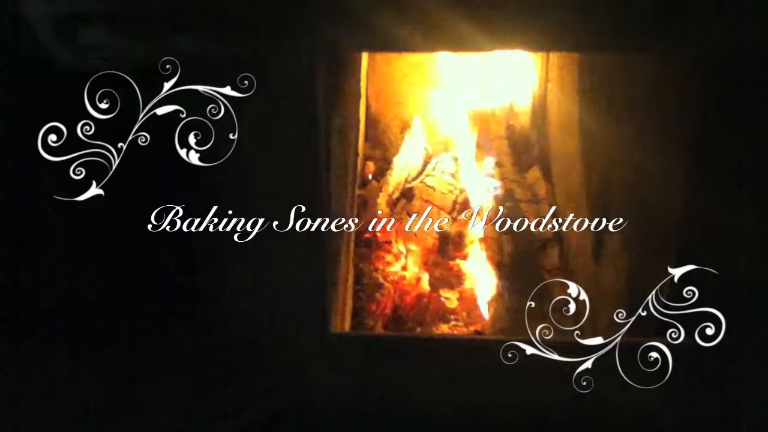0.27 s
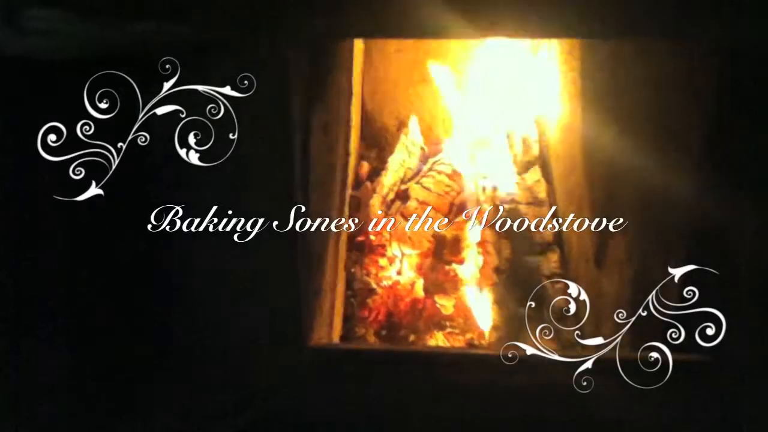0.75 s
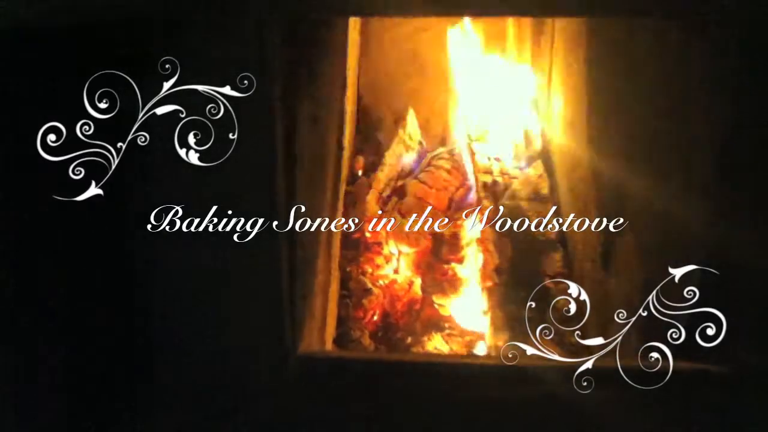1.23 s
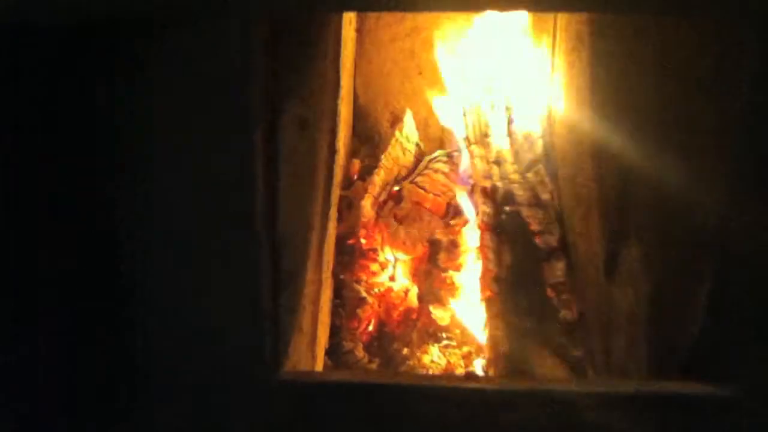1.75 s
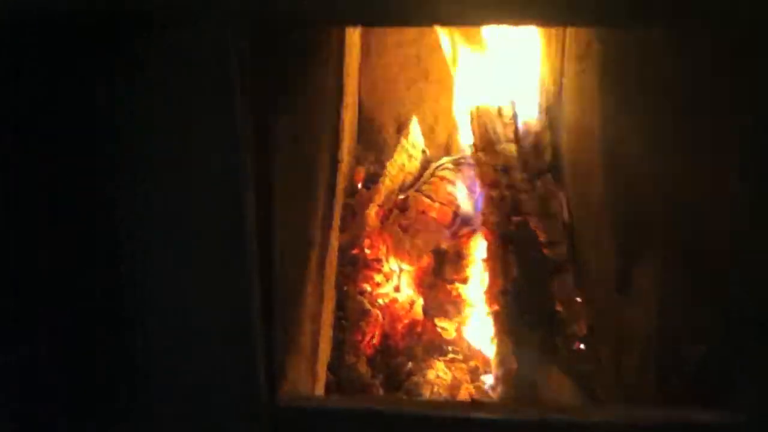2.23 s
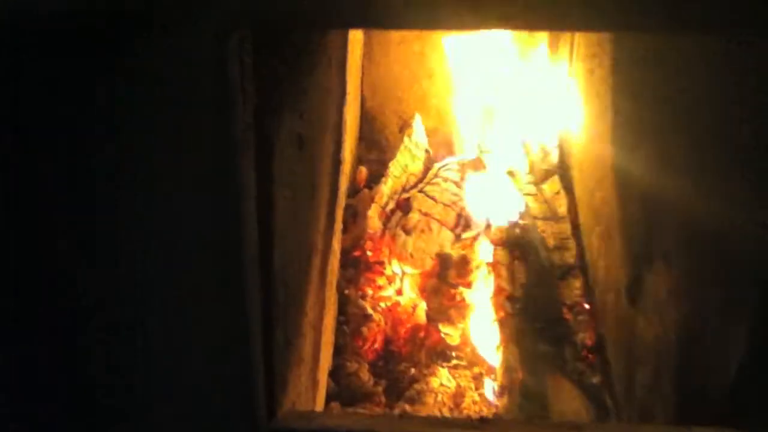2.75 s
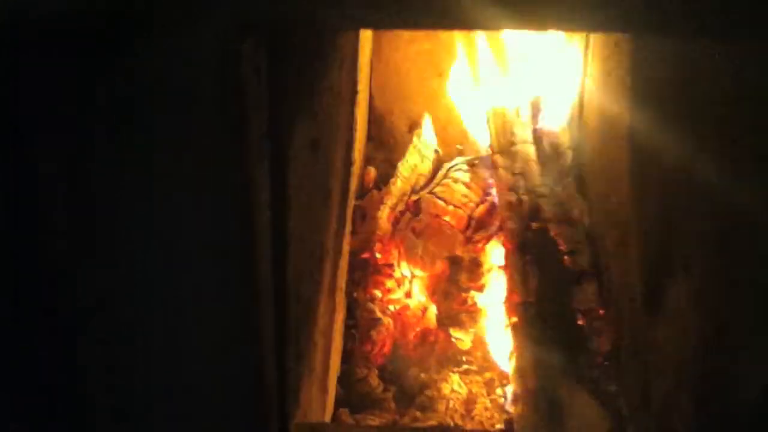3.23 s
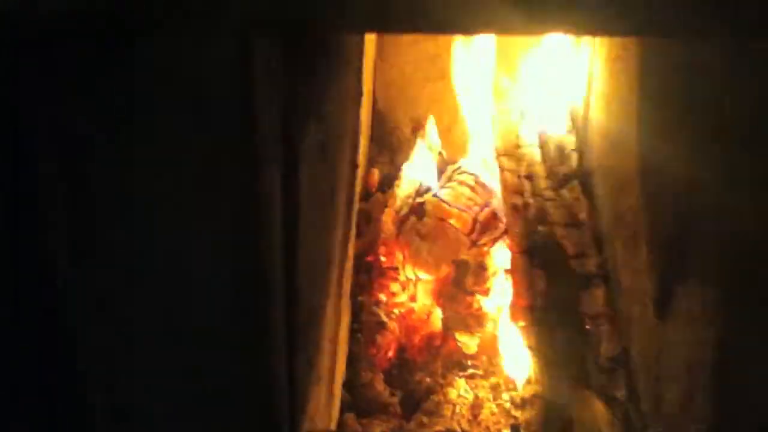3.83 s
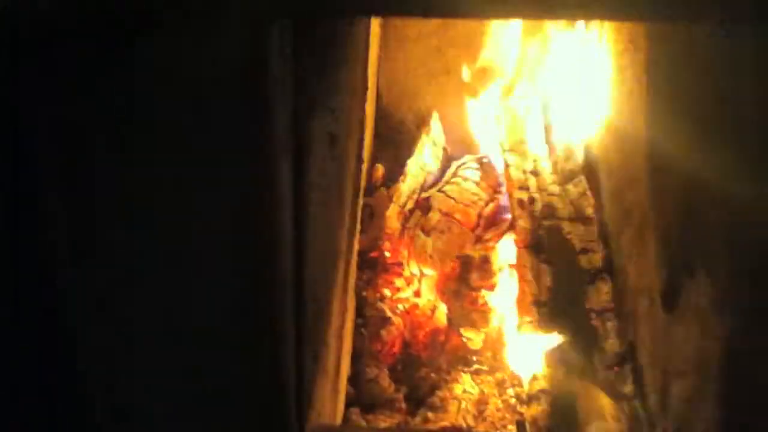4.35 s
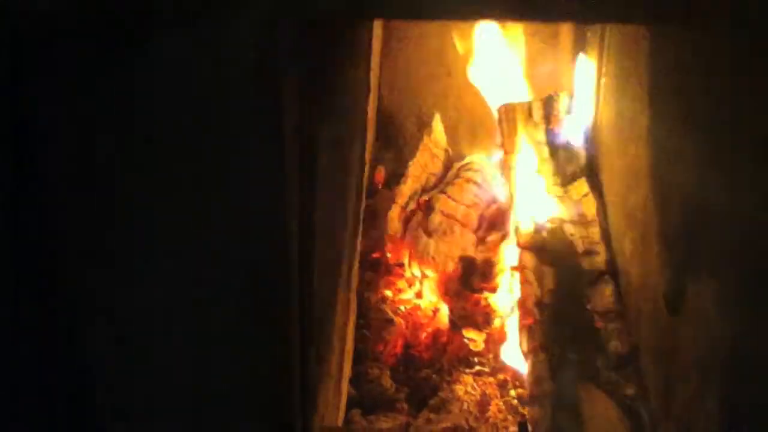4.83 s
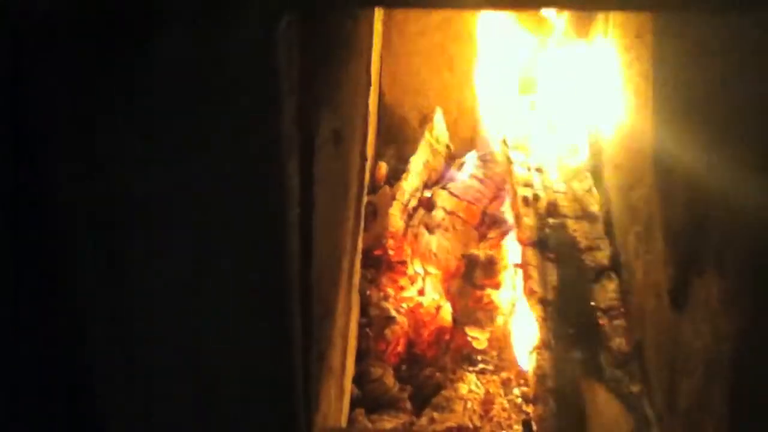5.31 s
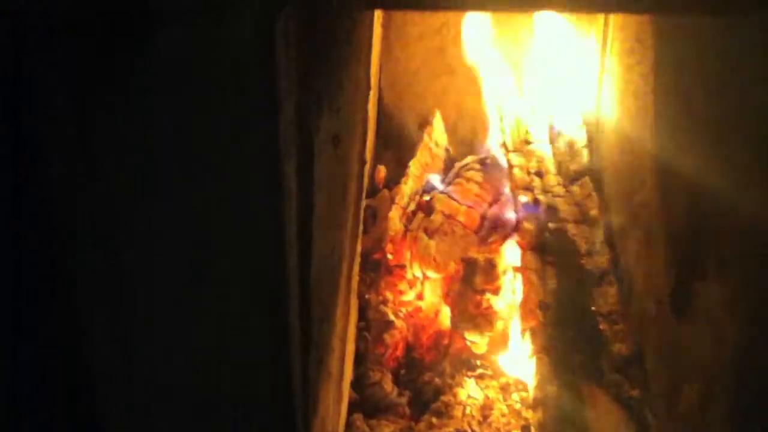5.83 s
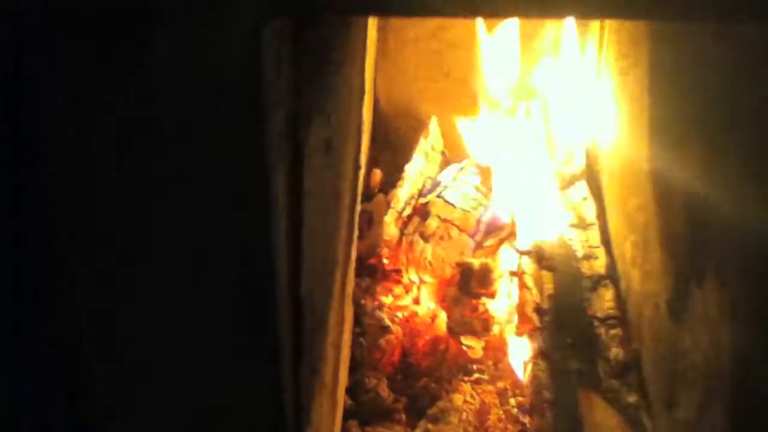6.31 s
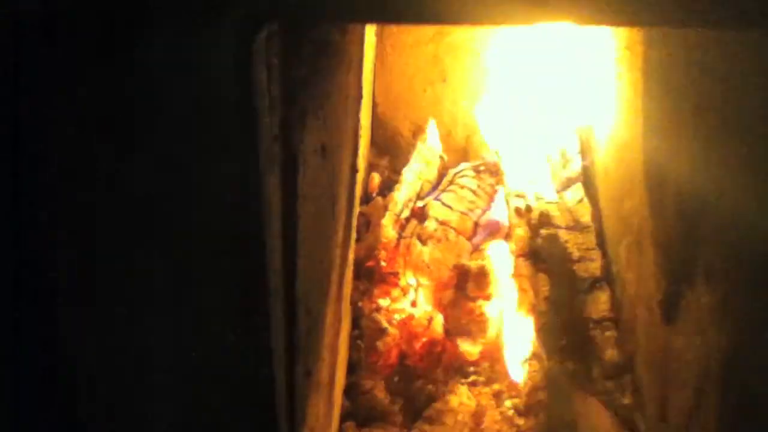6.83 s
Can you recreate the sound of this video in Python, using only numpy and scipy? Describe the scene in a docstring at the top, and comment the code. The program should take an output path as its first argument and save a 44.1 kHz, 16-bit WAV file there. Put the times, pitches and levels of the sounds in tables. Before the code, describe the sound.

Close microphone on a wood stove fire indoors, quite dry with only a slight room tail. Irregular crisp snaps and tiny ticks sit above low, thudding bursts of burning gas and a soft steady rush of air. There is one muted knock near the start, a strong snap past the middle, then fizzing, more pops, and a sudden short dip at the end.

```python
"""Logs burning in a wood stove

Logs burn in the open firebox of a wood stove, close by in a small room.
Pockets of gas ignite with soft low puffs, made of short pressure pulses that ring the firebox, and fizz.
Wood snaps and ticks are noise bursts through resonances; embers are tiny bursts of noise.
Shaped noise makes the steady draught, a faint sizzle, one dull knock and a faint high whine.
The level dips briefly near the end."""
import sys
import numpy as np
from scipy import signal
from scipy.fft import rfft, irfft, next_fast_len
from scipy.io import wavfile

SR = 44100
rng = np.random.default_rng(int(sys.argv[2]) if len(sys.argv) > 2 else 0)


def wav_out(sig):
    """Save sig, one row per channel (or a flat mono array), as 16-bit PCM at SR to the path in sys.argv[1]."""
    wavfile.write(sys.argv[1], SR, np.round(np.clip(np.atleast_2d(sig).T, -1, 1) * 32767).astype(np.int16))


N = 311513
TIME = np.arange(N) / SR  # seconds

# The loudest gas pockets igniting, levels before the flames are mixed:
# (time [s], peak level [dB], crest width at half height [ms], fizz against the peak [dB])
BIG_PUFFS = [(0.3001, -40, 1.4, -21), (0.3715, -33.5, 2.1, -31), (0.482, -34.5, 1.8, -26.5),
             (0.5815, -41, 1.25, -20), (0.7495, -39, 1.8, -32), (0.802, -36.5, 1.2, -28),
             (0.8287, -35.5, 1.8, -23), (0.89, -41, 1.8, -18), (0.9709, -43, 2.2, -25),
             (1.078, -42, 2, -23), (1.164, -33, 2, -23), (1.2978, -39.5, 1.9, -28),
             (1.531, -43.5, 1.6, -13), (1.954, -44, 1.4, -31), (2.1597, -38.0, 1.55, -19.0),
             (2.4342, -37.5, 1.66, -41), (2.6547, -43, 1.4, -24), (2.7762, -33.5, 1.2, -22.5),
             (2.98, -35.5, 2, -32), (3.0169, -37, 1.7, -18.0), (3.0697, -34.5, 1.17, -19),
             (3.304, -38.0, 2.6, -27), (3.3119, -36.5, 1.3, -30), (3.337, -33.5, 1.9, -22),
             (3.5761, -34, 1.7, -20), (3.7449, -37.0, 1.8, -32), (3.7701, -35.5, 1.2, -36),
             (3.8119, -34, 1.45, -43), (3.952, -37.5, 2.3, -17), (4.0386, -36, 2, -19),
             (4.3377, -37.5, 1.9, -18), (4.35, -37, 0.77, -16.5), (4.3563, -25.5, 1.44, -36),
             (4.4537, -39.5, 2.1, -18), (4.5708, -39.5, 1.3, -17), (4.679, -46.5, 0.8, -14.5),
             (4.7205, -38, 0.81, -27), (4.7276, -35.5, 1.3, -33), (4.8792, -29, 1.08, -21.5),
             (4.8854, -33.5, 2, -24.0), (4.917, -32.5, 1.7, -25.5), (4.9298, -34, 2.2, -21.0),
             (5.1669, -40, 1.0, -25.0), (5.563, -36, 2, -25), (5.5784, -35.5, 2.1, -23),
             (5.631, -36.5, 2.8, -21), (5.6537, -35, 1.9, -19.0), (5.9815, -48.5, 1.2, -7),
             (6.2435, -38, 1.3, -18.0), (6.2629, -33.5, 1.8, -26), (6.3771, -34, 1.46, -18.5),
             (6.39, -45, 1.3, -15), (6.4446, -33.5, 1.4, -23), (6.68, -33.5, 1.43, -32),
             (6.6862, -38.5, 2.4, -28), (6.8119, -39, 1.4, -21), (6.929, -39, 1.9, -20)]
# Tone of burning gas: (frequency [Hz], relative level [dB])
FIZZ_SPECTRUM = [(300, -25), (550, 3.5), (770, 0.5), (950, 6), (1300, -2.5), (1700, -1), (2000, 2.5),
                 (2250, -0.5), (2750, 2), (3300, -0.5), (3900, -13.5), (8000, -32)]


def from_db(db):
    """Turn decibels into gain."""
    return 10 ** (np.asarray(db) / 20)


def rms_one(x):
    """Scale a sound to an average strength (rms) of 1."""
    return x / np.sqrt(np.mean(x ** 2) + 1e-20)


def in_time(rows):
    """Draw straight lines between (time, level) rows; the end levels hold outside them."""
    times, levels = np.transpose(rows)
    return np.interp(TIME, times, levels)


def add(out, seconds, sound):
    """Mix a sound into out, starting at the given time."""
    start = max(0, round(seconds * SR))
    part = out[start:start + len(sound)]
    part += sound[:len(part)]


def band(x, low_hz, high_hz):
    """Keep only the frequencies between two steep edges."""
    edges = [low_hz, min(high_hz, .45 * SR)]
    return signal.sosfilt(signal.butter(4, edges, "band", fs=SR, output="sos"), x)


def coloured(x, spectrum):
    """Shape the tone of x by a (frequency, level) curve, then scale it to rms 1."""
    hz, db = np.transpose(spectrum)
    size = next_fast_len(N)
    bins_hz = np.maximum(np.arange(size // 2 + 1) * SR / size, 1)
    gain = from_db(np.interp(np.log(bins_hz), np.log(hz), db))
    return rms_one(irfft(rfft(x, size) * gain, size)[:N])


def resonate(x, modes):
    """Let x ring several resonances side by side: (frequency [Hz], width [Hz], level [dB])."""
    out = 0
    for hz, width, db in modes:
        r = np.exp(-np.pi * width / SR)
        feedback = [1, -2 * r * np.cos(2 * np.pi * hz / SR), r * r]
        ringing = signal.lfilter([1, 0, -1], feedback, x + 1e-18)
        out = out + from_db(db) * (1 - r * r) / 2 * ringing
    return out


def dying_noise(t60, length):
    """Noise that falls by 60 dB in t60 seconds; length is in samples."""
    t = np.arange(length) / SR
    return rng.standard_normal(length) * np.exp(-np.log(1000) * t / t60)


def random_clicks(per_s, spread_db):
    """Clicks at random moments, many small and few large."""
    sizes = from_db(spread_db * np.minimum(rng.exponential(1, N), 3))
    return (rng.random(N) < per_s / SR) * sizes


def linger(x, seconds):
    """Smooth x so that each change fades over the given time."""
    r = np.exp(-1 / (seconds * SR))
    return signal.lfilter([1 - r], [1, -r], x + 1e-18)


def puff(width_ms, skew=0.16):
    """Pressure of a gas pocket that swells and collapses: a crest between two troughs, the later deeper."""
    spread = width_ms / 1250 * SR  # in samples; makes the crest width_ms wide at half height
    u = np.arange(-600, 600) / spread
    return (1 - u * u - skew * u) * np.exp(-u * u / 2)


def draught(level_db):
    """Steady air flow through the fire, as noise with a mostly low tone."""
    # tone of the air flow: (frequency [Hz], relative level [dB])
    draught_spectrum = [(20, -58), (60, -4), (110, -1), (145, 0.5), (236, -6), (330, -10), (545, -13.5),
                        (800, -18), (1400, -19), (3100, -21.5), (4000, -21.5), (7100, -21), (15500, -25.5),
                        (16500, -66)]
    return from_db(level_db) * coloured(rng.standard_normal(N), draught_spectrum)


def whine(hz, width_hz, level_db):
    """A faint high whine: noise through one very narrow resonance."""
    narrow = resonate(rng.standard_normal(N), [(hz, width_hz, 0)])
    return from_db(level_db) * rms_one(narrow)


def flames(flutter_db):
    """Puffs of igniting gas set the firebox air ringing; each one also fizzes as it burns."""
    # air modes of the firebox: (frequency [Hz], width [Hz], level [dB])
    firebox_modes = [(122.4, 11.3, 2), (161, 9.7, -3), (214.3, 44, -1.5), (257, 22, -7.5),
                     (347.3, 28, -0.5), (434, 74, 0), (548, 41, 3)]
    # faint sizzle of a log, stronger for a while, before a 4.5 dB cut: (time [s], level [dB])
    sizzle_curve = [(0, -66), (2.3, -70.5), (3.3, -73), (5.25, -63), (5.64, -56.5), (6.0, -59.5),
                    (6.15, -70), (7.0, -59.5)]
    big_pressure, fizz = big_puffs(fizz_t60=0.042, grit_db=4.0)
    vigour = np.hypot(from_db(flutter_db - 2.5), stir())
    lesser = vigour * small_puffs(per_s=170, spread_db=3.0, narrow_ms=0.49, wide_ms=2.39, size_law=0.66)
    pressure = from_db(-1.33) * big_pressure + lesser
    burning = linger(np.maximum(lesser, 0), seconds=0.0043)
    flare = from_db(-6.0) * burning * coloured(rng.standard_normal(N), FIZZ_SPECTRUM)
    sputter = coloured(random_clicks(per_s=450, spread_db=5.0), FIZZ_SPECTRUM)
    sizzle = from_db(in_time(sizzle_curve) - 4.5) * sputter
    return pressure + resonate(pressure, firebox_modes) + from_db(5.0) * fizz + flare + sizzle


def small_puffs(per_s, spread_db, narrow_ms, wide_ms, size_law):
    """A stream of lesser ignitions of several widths; wider pockets push harder."""
    widths = np.geomspace(narrow_ms, wide_ms, num=6)
    out = 0
    for width_ms in widths:
        ignitions = random_clicks(per_s / len(widths), spread_db)
        out = out + width_ms ** size_law * signal.oaconvolve(ignitions, puff(width_ms), "same")
    return rms_one(out)


def embers(flutter_db):
    """Countless tiny ticks in the charcoal, each a very short burst, partly following the flutter."""
    # tone of the ticks: (frequency [Hz], relative level [dB])
    ember_spectrum = [(2000, -12), (3200, 5), (4200, 1.5), (5500, 4), (7100, 6.5), (9500, 5.5),
                      (12000, 0.5), (16000, -62)]
    level_db = -63.5 + 0.35 * (flutter_db - flutter_db.mean())  # 0.35: share of the flutter's swing
    power = linger(random_clicks(per_s=230, spread_db=3.0) ** 2, seconds=0.0013)
    bursts = np.sqrt(power) * rng.standard_normal(N)
    return from_db(level_db) * coloured(bursts, ember_spectrum)


def room(x, t60, wet_db, delay_s):
    """Dense reflections from the walls make a faint tail that dies away."""
    tail = band(dying_noise(t60, SR // 2), 240, 4900)
    tail[:int(delay_s * SR)] = 0
    tail = tail / np.sqrt(np.sum(tail ** 2))
    return from_db(wet_db) * signal.fftconvolve(x, tail)[:N]


def snaps(crack_s, crack_db, plain_db, splinter_width_hz, splinter_db):
    """A fibre bursts with a sharp crack and tears on for a few ms; its splinter rings at its own pitch."""
    # wood snaps: (time [s], middle-band level over 5 ms [dB], low band against middle [dB],
    # high band against middle [dB], splinter pitch [Hz], time to fall by 60 dB [ms])
    snap_rows = [(0.0113, -45, -20, -11, 10160, 12), (0.1439, -47.5, -8, -5, 7200, 7.0),
                 (0.1826, -36, -18, -5, 7250.0, 15), (0.2604, -40, 7, -1, 4670, 21),
                 (0.275, -33.5, -5.5, -1, 7700, 17.0), (0.4215, -50.5, -12.0, -12.0, 7300.0, 8),
                 (0.4618, -39.0, -19, 3.5, 6300, 17), (0.4754, -43.5, -7.5, -8, 7160.0, 9.0),
                 (0.5477, -52, -22, -14, 8400.0, 7.4), (0.5952, -29.5, -4, -23.0, 6200, 12),
                 (0.7761, -44, -7, -6, 9900, 14), (1.128, -54.5, 2.5, -14.0, 6850, 14.0),
                 (1.4419, -47.5, -19, 0, 8000.0, 31.0), (1.4874, -55.5, 5.5, -4.0, 3330.0, 10),
                 (1.596, -52.0, -15.0, -2, 8140, 6.0), (1.6417, -49, 1.0, -3, 4770.0, 19),
                 (1.849, -57.0, -16.0, 7, 13300.0, 16), (2.4566, -30, -19.5, -4, 7360, 15.0),
                 (2.654, -51, -7.5, -8.0, 4770.0, 14.0), (2.6944, -38.5, -12.5, -4.5, 6500, 38.0),
                 (2.8255, -54, 2.5, -1, 2940, 11.0), (3.1327, -44.5, -15, -28, 6740, 9.2),
                 (3.2642, -51, -5, -7.5, 6200.0, 13), (3.2965, -59, 9.0, -13, 2540.0, 18),
                 (3.4826, -52, 0.0, -3.0, 6060, 32), (3.4903, -45.5, 0.5, -6.0, 9700.0, 25),
                 (3.5692, -39.0, -4.5, 0.5, 7500.0, 17.0), (3.686, -40.5, -9.5, -1, 7550, 15),
                 (3.9619, -68, 17, -5, 2020.0, 20.0), (4.041, -37.5, 2, -12, 3250, 20),
                 (4.0827, -40, -4, -7, 6350, 28), (4.1669, -40, -5, -2.0, 4800, 13),
                 (4.1919, -25, -12.5, -4, 7000, 27), (4.3598, -32.5, -13.0, -5.5, 7370, 23.0),
                 (4.3999, -52.5, -22, 6, 11800, 8.9), (4.4953, -51, -3.5, 0, 6750, 17),
                 (4.713, -47.5, -10, -8, 6460.0, 31), (5.178, -60.0, 2.0, 10.5, 12100, 5.0),
                 (5.7897, -40.5, -7.5, -10, 9700, 22), (6.035, -47, -6, -15.0, 6900, 7.3),
                 (6.072, -49.5, -0.5, 2.0, 3260, 25), (6.3277, -52.5, -2, -6, 9300.0, 12.0),
                 (6.4374, -31, -19, -33, 6430, 16), (6.8845, -21.5, -14.0, -4.5, 7930, 27)]
    # low, middle and high band: (lower edge [Hz], upper edge [Hz])
    snap_bands = [(1800, 5200), (5700, 10000), (10000, 16200)]
    # ring of the splitting wood: (frequency [Hz], width [Hz], level [dB])
    wood_ring = [(2140, 510, -8), (2830, 380, 2), (3390, 570, 5.5), (4890, 820, 5), (6950, 920, 5),
                 (8440, 150, -1.5), (11130, 730, -6), (12730, 1300, -1.5)]
    crack_follows, usual_snap_db = 0.51, -36  # extra crack [dB] per dB of snap level above the usual
    out, length, window = np.zeros(N), 1800, .005 * SR  # length and window in samples
    for s, level_db, low_db, high_db, pitch_hz, t60_ms in list(snap_rows) + ticks():
        burst = dying_noise(t60_ms / 1000, length)
        # big snaps break more cleanly: the fibre gives way in one step
        step_db = crack_db + crack_follows * (level_db - usual_snap_db)
        add(burst, crack_s, from_db([step_db]))
        splinter = (pitch_hz, splinter_width_hz, splinter_db)
        burst = from_db(plain_db) * burst + resonate(burst, list(wood_ring) + [splinter])
        for db, (low_hz, high_hz) in zip((low_db, 0, high_db), snap_bands):
            part = band(burst, low_hz, high_hz)
            add(out, s, from_db(level_db + db) * part * np.sqrt(window / np.sum(part ** 2)))
    return out


def ticks():
    """Lesser splinters give way at random, with random level, tone and pitch; same columns as snaps."""
    count, t60_ms = 14, 25
    level_db, low_db, high_db, spread_db = -57, -1.5, -3, 5  # each level varies by up to the spread
    lowest_hz, highest_hz = 2300, 9800
    rows = []
    for when, pitch, size, low, high in rng.random((count, 5)):
        rows.append((when * N / SR,
                     level_db + spread_db * (2 * size - 1),
                     low_db + spread_db * (2 * low - 1),
                     high_db + spread_db * (2 * high - 1),
                     lowest_hz * (highest_hz / lowest_hz) ** pitch,
                     t60_ms))
    return rows


def stir():
    """A big puff stirs up lesser ones just before and after it: the strength of that brief surge."""
    stir_db, half_length_s, delay_s = -15.5, .016, .003  # level is against the big puff's peak
    power, lag = np.zeros(N), np.arange(-SR // 10, SR // 10) / SR
    for s, db, _, _ in BIG_PUFFS:
        surge = from_db(db + stir_db) ** 2 * np.exp(-(lag / half_length_s) ** 2)
        add(power, s + delay_s + lag[0], surge)
    return np.sqrt(power)


def big_puffs(fizz_t60, grit_db):
    """The ignitions that stand out: their pressure, and the gritty fizz that comes with each."""
    pressure, fizz, window = np.zeros(N), np.zeros(N), .005 * SR  # window in samples
    for s, db, width_ms, fizz_db in BIG_PUFFS:
        pulse = from_db(db) * puff(width_ms)
        add(pressure, s - len(pulse) / 2 / SR, pulse)
        roughness = from_db(grit_db * rng.standard_normal(len(pulse)))
        grit = dying_noise(fizz_t60, len(pulse)) * roughness
        add(fizz, s - .001, from_db(db + fizz_db) * grit * np.sqrt(window / np.sum(grit ** 2)))
    return pressure, np.std(fizz) * coloured(fizz, FIZZ_SPECTRUM)


def knock():
    """A dull, hollow knock: shaped noise that starts quickly and dies away."""
    # tone of the knock: (frequency [Hz], relative level [dB])
    knock_spectrum = [(120, -9), (330, 1), (400, -2), (500, 5), (750, -9), (1100, -19), (1250, -1),
                      (1480, -6), (1650, -17), (2100, -15), (3500, -29), (7000, -48)]
    start_s, level_db, rise_s, t60_s = 1.768, -44.5, 0.00081, 0.33
    age = np.maximum(TIME - start_s, 0)
    envelope = (1 - np.exp(-age / rise_s)) * np.exp(-np.log(1000) * age / t60_s)
    return from_db(level_db) * envelope * coloured(rng.standard_normal(N), knock_spectrum)


def scene():
    """Fire, its echo in the room, the knock, the steady draught and a faint high whine."""
    # flutter of the flames between big puffs, before flames() cuts it by 2.5 dB: (time [s], level [dB])
    flutter_curve = [(0.0, -55.5), (0.12, -59.0), (0.48, -52), (1.68, -59), (1.92, -49), (2.37, -65),
                     (2.52, -55.5), (3.63, -51.5), (4.41, -53.5), (4.56, -53), (4.89, -52.5), (5.4, -55),
                     (5.64, -49.5), (6.15, -56), (6.24, -54.5), (6.63, -55.0), (6.78, -47.5), (6.9, -54)]
    flutter_db = in_time(flutter_curve)
    wood = snaps(crack_s=.0005, crack_db=11, plain_db=-5, splinter_width_hz=490, splinter_db=13.5)
    fire = flames(flutter_db) + embers(flutter_db) + wood
    echo = room(fire, t60=0.4, wet_db=-33.5, delay_s=.004)
    steady = draught(level_db=-56.5) + whine(hz=14993, width_hz=30, level_db=-82)
    return (fire + echo + knock() + steady)[None]


def record(dry):
    """The level of the whole sound dips briefly; the treble above 16.5 kHz is cut."""
    # level of the whole sound, end rows hold before and after: (time [s], level [dB])
    dip_curve = [(6.94, -1.5), (6.955, -20), (6.966, -29), (6.978, -17), (7.0, -10), (7.03, -5.5)]
    treble_cut = signal.ellip(10, .2, 70, 16500, fs=SR, output="sos")
    return signal.sosfilt(treble_cut, dry * from_db(in_time(dip_curve)))


dry = scene()
out = record(dry)
wav_out(out)
```